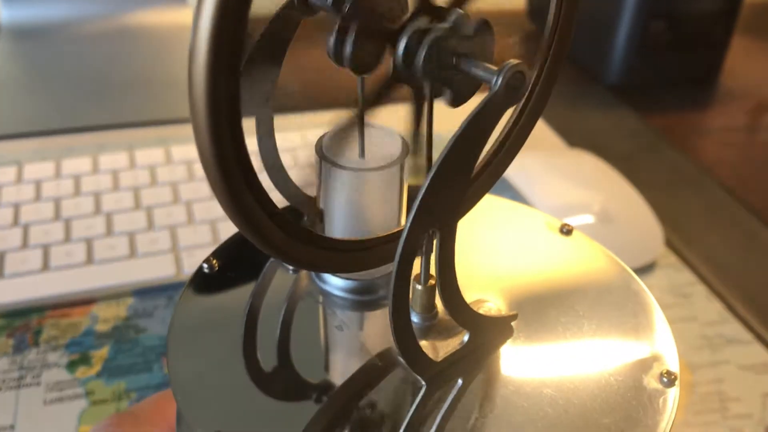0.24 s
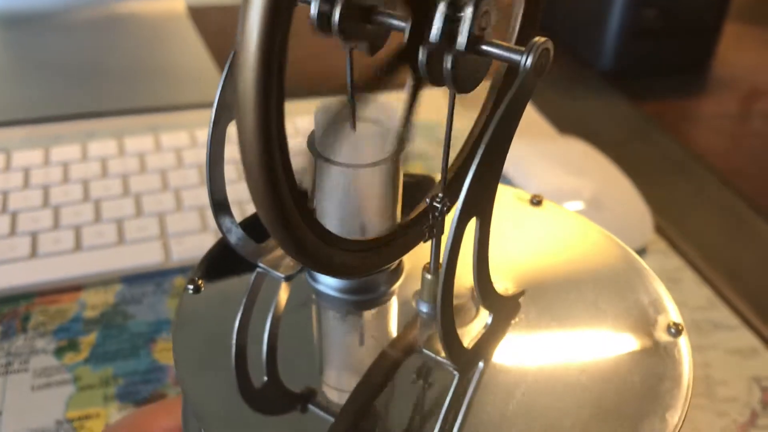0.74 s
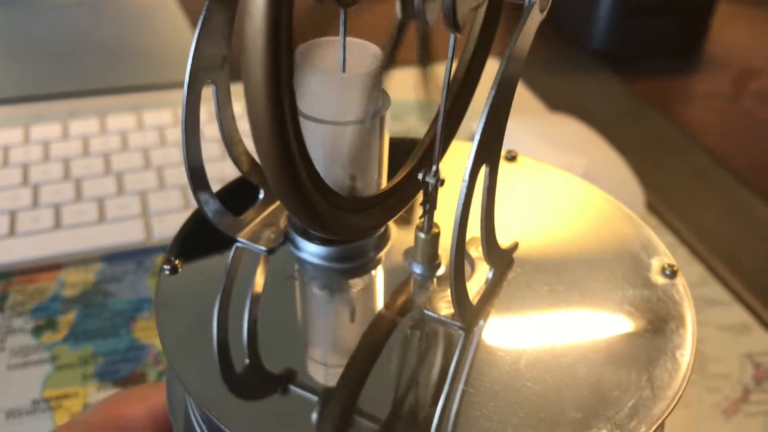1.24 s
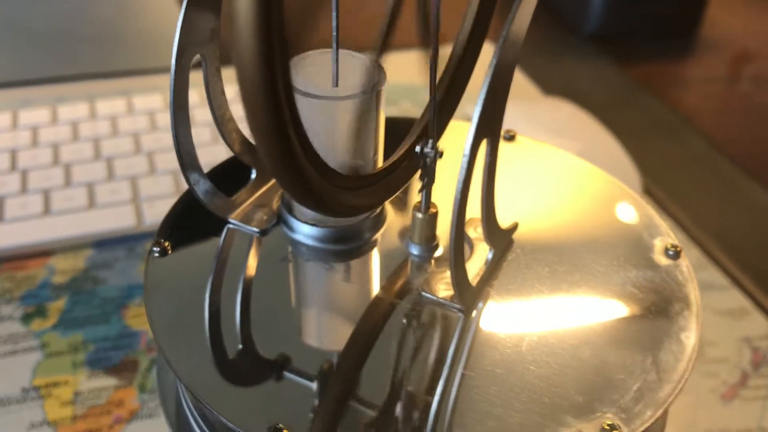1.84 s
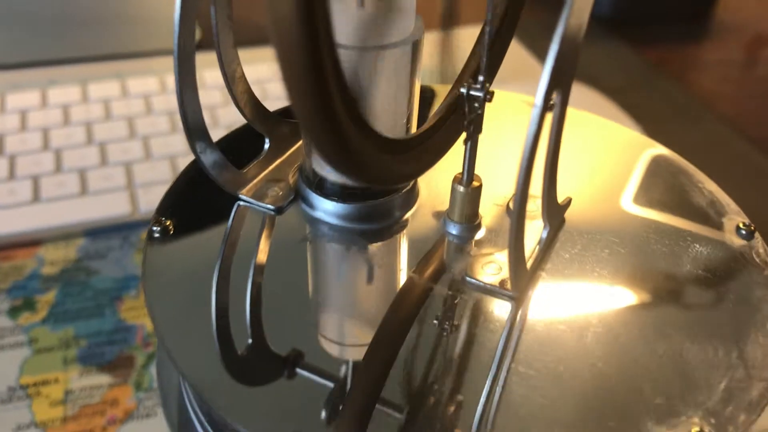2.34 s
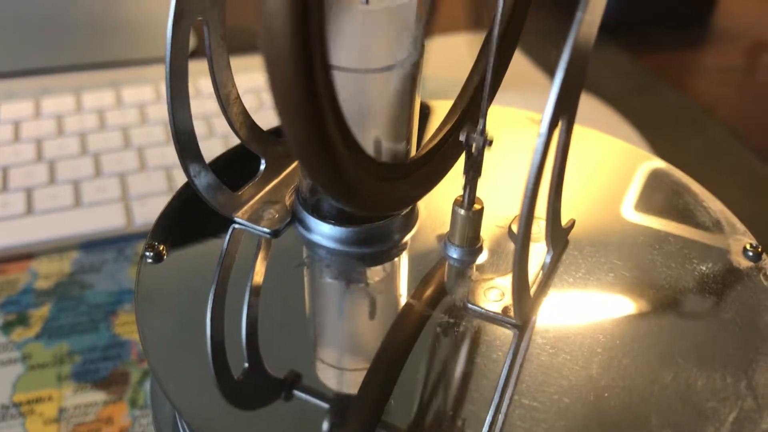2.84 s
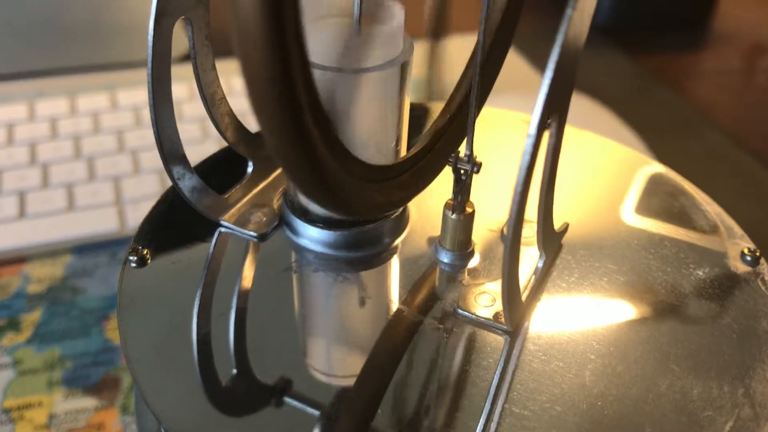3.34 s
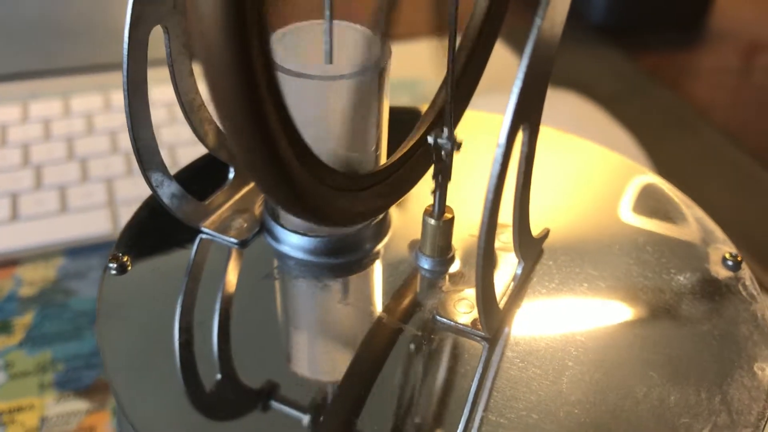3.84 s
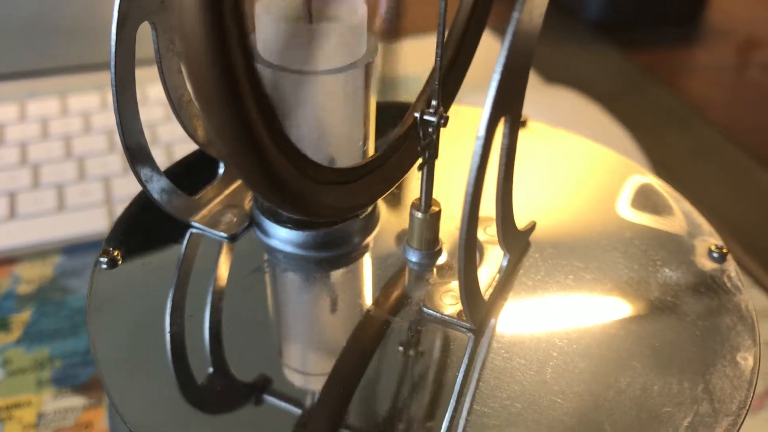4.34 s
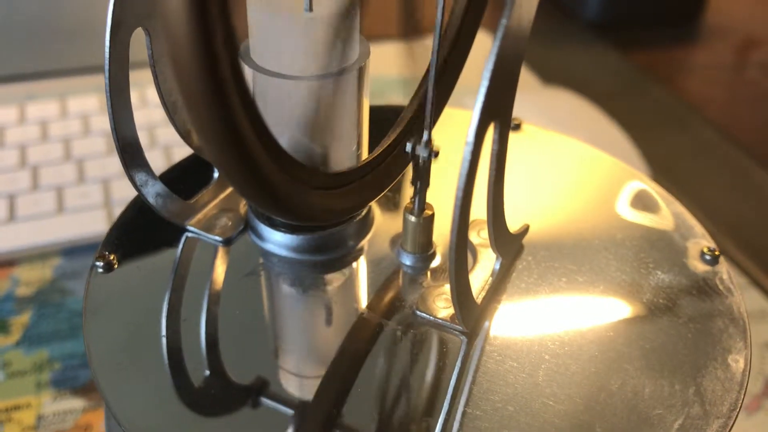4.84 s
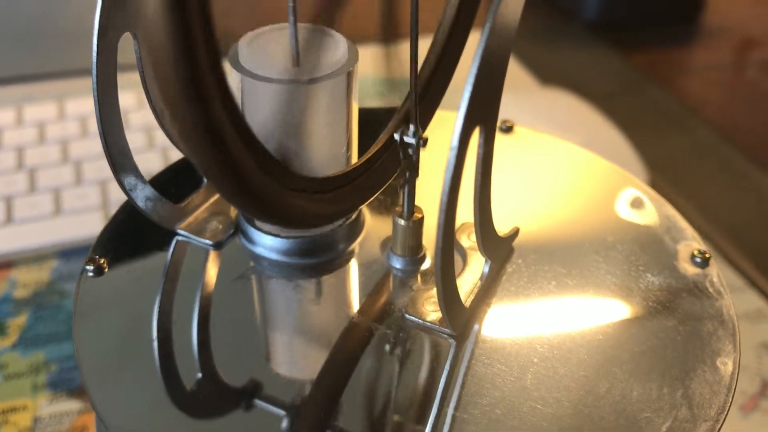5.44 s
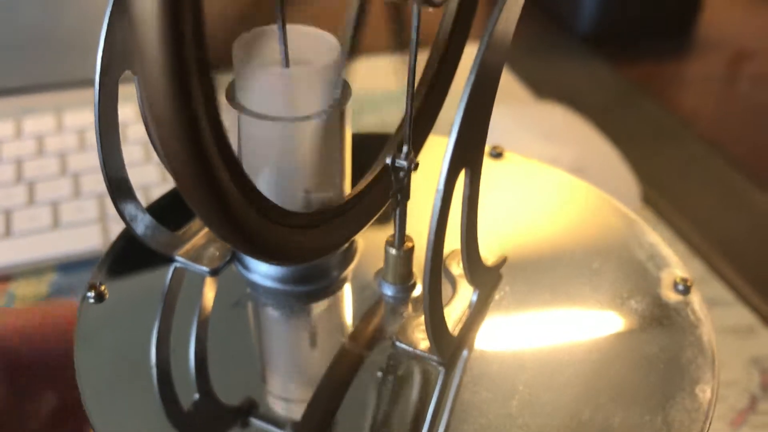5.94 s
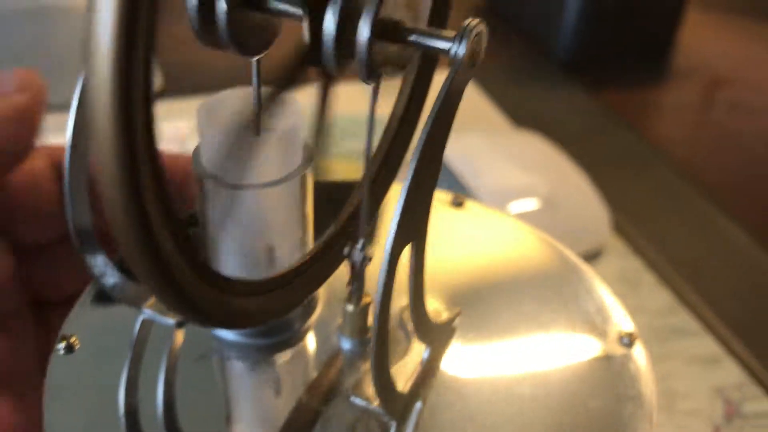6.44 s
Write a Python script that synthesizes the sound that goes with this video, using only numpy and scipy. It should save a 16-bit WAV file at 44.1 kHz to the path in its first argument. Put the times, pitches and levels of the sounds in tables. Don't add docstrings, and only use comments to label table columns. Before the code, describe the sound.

A small desktop hot-air engine clacks steadily about two and a half turns a second, each stroke squeaking thinly over faint room hum.

```python
import sys
import numpy as np
from scipy import signal
from scipy.fft import rfft, irfft, next_fast_len
from scipy.io import wavfile
from scipy.ndimage import map_coordinates

SR = 44100
rng = np.random.default_rng(int(sys.argv[2]) if len(sys.argv) > 2 else 0)


def digitize_waveform(pressure):
    field = np.atleast_2d(pressure).T
    bounded = np.clip(field, -1, 1)
    quanta = np.round(bounded * 32767).astype(np.int16)
    wavfile.write(sys.argv[1], SR, quanta)


def gain_from_decibels(decibels):
    exponent = np.asarray(decibels, float) / 20
    return 10 ** exponent


N = 294131
T = np.arange(N) / SR

# time in s, peak in dB, thud in dB, glass song in dB, wheel song in dB.
BOTTOM_KNOCKS = [(0.2796, -23, -5.5, -59, -82), (0.6873, -24, -9.5, -53, -84),
                 (1.0935, -25.5, -7.5, -60, -90), (1.498, -21, -8, -61, -57), (1.9006, -22, -5, -50, -84),
                 (2.3022, -25, -6.5, -54, -52), (2.703, -21, -6.5, -48, -51),
                 (3.102, -21.5, -6.5, -49.5, -54.5), (3.5007, -21, -6, -52, -57),
                 (3.899, -23, -6, -54, -48), (4.2963, -23, -7, -49.5, -58),
                 (4.6924, -22.5, -4.5, -49.5, -51), (5.0883, -21, -8.5, -52, -53.5),
                 (5.4839, -20, -6, -53.5, -54), (5.8765, -21.5, -6, -52, -54),
                 (6.2703, -23.5, -6, -50, -62), (6.663, -22.5, -14, -59, -46)]
# time in s, peak in dB, thud in dB.
TOP_KNOCKS = [(0.0817, -28, -16), (0.49, -28.5, -17.5), (0.897, -29, -17), (1.3024, -28.5, -19),
              (1.7055, -27.5, -17), (2.1077, -28, -14.5), (2.5087, -28, -15), (2.908, -26.5, -18),
              (3.3074, -26.5, -18), (3.706, -28, -18), (4.1021, -28, -18), (4.4996, -26.5, -17),
              (4.8962, -27.5, -19), (5.2906, -25, -17.5), (5.686, -24.5, -18.5), (6.0782, -25, -19),
              (6.471, -29.5, -13)]
# push after the click in s, build-up in s.
CONTACT_PUSH = [
    (-.0014, .0031),
    (.002, .0051),
    (-.0003, .0019),
]


def unit(x):
    return x / np.sqrt(np.mean(x ** 2) + 1e-20)


def along(points, hz):
    f, v = np.transpose(points)
    return np.interp(np.log(hz + 1), np.log(f + 1), v)


def wobble(rate):
    return map_coordinates(rng.standard_normal(int(N * rate / SR) + 4), [T * rate])


def flutter(depth_db, rate):
    return gain_from_decibels(depth_db * (np.tanh(wobble(rate) + .4) - .3))


def swells(rows):
    return sum(gain_from_decibels(db) * np.exp(-((T - s) / half) ** 2) for s, half, db in rows)


def filtered(x, response):
    m = next_fast_len(len(x) + SR // 2)
    return irfft(rfft(x, m) * response(np.fft.rfftfreq(m, 1 / SR)), m)[:len(x)]


def resonant(x, peaks):
    def response(f):
        return sum((-1) ** k * gain_from_decibels(db) * 1j * f * w / (c * c - f * f + 1j * f * w)
                   for k, (c, w, db) in enumerate(peaks))
    return filtered(x, response)


def tone(hz):
    return np.sqrt(2) * np.sin(2 * np.pi * np.cumsum(hz + 0 * T) / SR)


def thud(spot):
    # mode in Hz, t60 in s, then the swing at bottom, top and tap in thousandths.
    body_modes = [(128, .45, 1, .6, -.3), (160, .12, 3, 2, .2), (249, .1, -18.9, -4.3, -1.3),
                  (254, .17, 9.1, 0, 1.1), (286, .08, 7.1, -5.8, 1.3), (531, .12, 3.9, .2, -2.1),
                  (548, .11, 5.7, 5, -6.2), (616, .09, -11, -4.1, -3.7), (681, .04, 4.6, -12.9, 6.7),
                  (710, .11, 4.3, 4.9, -.7), (740, .29, -2.2, -.2, -.5), (926, .03, -11.6, -4.2, 1),
                  (997, .03, -13.6, .6, 0), (1049, .03, 5.5, -2.5, 0)]
    hz, t60, *swing = np.transpose(body_modes)[..., None]
    t = T[:SR // 4]
    ringing = swing[spot] / 1000 * np.sin(2 * np.pi * hz * t) * gain_from_decibels(-60 * t / t60)
    return ringing.sum(0) * (1 - np.exp(-t / CONTACT_PUSH[spot][1]))


def knocks(events, modes, crack, ring_db, crack_db, thud_db, damp, echoes, spot=2):
    # frequency in Hz, t60 in s.
    ring_out = [(900, 0.11), (2500, 0.16), (5000, 0.078), (9000, 0.12), (15000, 0.0086)]
    size = SR // 5
    t, out, pushes = T[:size], np.zeros(N + SR), np.zeros(N + SR)
    for s, db, low_db, *_ in events:
        for late, less_db in echoes:
            hz, tt, z = signal.stft(rng.standard_normal(size), SR, nperseg=128)
            decay_db = 60 * tt / (damp * along(ring_out, hz)[:, None])
            z = z * gain_from_decibels(along(crack, hz)[:, None] - decay_db)
            noise = signal.istft(z, SR, nperseg=128)[1][:size]
            hit = gain_from_decibels(crack_db) * noise * (0.83 + 0.61 * np.exp(-t / 0.00097))
            for f, (level, t60) in modes:
                mode_db = ring_db + level + rng.normal(0, 0.94) - 60 * t / min(t60, .15)
                hit += gain_from_decibels(mode_db) * np.sin(2 * np.pi * f * t)
            at = max(round((s + late * (1 + .1 * rng.normal())) * SR), 0)
            gain = gain_from_decibels(db + less_db + (late != 0) * rng.normal(0, 2.0))
            out[at:at + size] += gain * hit * (1 - np.exp(-t / 0.00031))
        pushes[round((s + CONTACT_PUSH[spot][0]) * SR)] = gain_from_decibels(db + low_db + thud_db)
    return out[:N] + signal.fftconvolve(pushes, thud(spot))[:N]


def bottom_knocks():
    plate_hz = (1055, 1308, 1560, 2540, 2934, 3090, 3854, 4581, 7085, 8311, 8473, 9220, 9860, 10260, 11410,
                11630, 12390, 14820, 15450)
    # level in dB, t60 in s.
    plate_ring = [(-3, 0.072), (-20, 0.17), (-1, 0.03), (10, 0.027), (-7.5, 0.047), (-10, 0.11),
                  (-15.5, 0.065), (-42, 0.3), (-5, 0.032), (-15.5, 0.12), (-9.5, 0.12), (-2, 0.038),
                  (-10.5, 0.33), (-31.5, 0.28), (0, 0.032), (-5, 0.061), (-7, 0.058), (3.5, 0.03),
                  (-16, .02)]
    # frequency in Hz, crack noise in dB per Hz.
    crack = [(530, -39), (900, 2), (1450, -14), (2560, 0), (3600, -16), (7850, -10.5), (8350, -15.5),
             (13300, -19.5), (15200, -17), (16500, -55)]
    return knocks(BOTTOM_KNOCKS, list(zip(plate_hz, plate_ring)), crack,
                  ring_db=-17.0, crack_db=-1.0, thud_db=28.5, damp=0.56, spot=0,
                  echoes=[(-.0035, -21), (0, -2.5), (.006, -11.5), (.013, -15), (.021, -17), (.058, -20.5)])


def top_knocks():
    frame_hz = (1540, 2560, 2930, 3300, 4608, 5600, 6500, 7090, 7704, 8473, 10970, 11640, 12380, 14790)
    # level in dB, t60 in s.
    frame_ring = [(-4.5, 0.048), (2.5, 0.045), (-6.5, 0.06), (-11.5, 0.12), (-45, 0.017), (-7.5, 0.16),
                  (-32, 0.014), (1.5, 0.03), (-3.5, 0.027), (-31, 0.032), (-34, 0.017), (1.5, 0.015),
                  (-4.5, 0.022), (-9, 0.019)]
    # frequency in Hz, crack noise in dB per Hz.
    crack = [(530, -24), (900, -11.5), (1940, -5), (2630, -16), (3780, -12), (7210, -4), (10000, -23),
             (11900, -42), (15300, -50), (16500, -46)]
    return knocks(TOP_KNOCKS, list(zip(frame_hz, frame_ring)), crack,
                  ring_db=-15.5, crack_db=-1.0, thud_db=43.0, damp=0.5, spot=1, echoes=[(0, 1), (.008, -10)])


def grip_level_db(rows):
    s, hold, db = np.transpose(rows)[..., None]
    t = T[::32]
    after = t - s - hold
    body = np.minimum(0, np.minimum(1500 * (t - s), -1500 * after))
    tail = np.where(after > 0, -13 - 279 * after, -120)
    power = gain_from_decibels(2 * (db + np.maximum(body, tail))).sum(0)
    return np.interp(T, t, 10 * np.log10(power + 1e-12))


def whistle(climb):
    # time in s, climb of the slip rate per stroke in Hz.
    glide = [(0, 331.4), (1, 260), (2, 180), (3.5, 190.8), (5, 176.7), (6.6, 218.4)]
    lock_at = (.03, .045, .06, .075, .09, .105, .125, .15)
    lock_notes = [(5580, 5580, 5590, 5570, 5760, 5750, 5770, 5750),
                  (5520, 5590, 5640, 5840, 5850, 5730, 5590, 5710),
                  (5540, 5570, 5530, 5630, 5570, 5550, 5730, 5630),
                  (5540, 5580, 5570, 5670, 5600, 5790, 5730, 5670),
                  (5550, 5690, 5560, 5600, 5600, 5550, 5780, 5560),
                  (5580, 5570, 5570, 5640, 5650, 5600, 5640, 5740),
                  (5600, 5550, 5630, 5600, 5640, 5680, 5670, 5600),
                  (5520, 5550, 5570, 5630, 5590, 5650, 5590, 5570),
                  (5350, 5560, 5560, 5630, 5640, 5640, 5680, 5530),
                  (5530, 5580, 5630, 5640, 5640, 5650, 5660, 5630),
                  (5580, 5500, 5600, 5630, 5620, 5570, 5590, 5600),
                  (5550, 5560, 5660, 5620, 5460, 5780, 5750, 5600),
                  (5580, 5570, 5590, 5610, 5550, 5640, 5660, 5640),
                  (5620, 5560, 5570, 5610, 5610, 5640, 5630, 5600),
                  (5560, 5580, 5590, 5650, 5720, 5700, 5770, 5800),
                  (5610, 5460, 5540, 5540, 5570, 5840, 5640, 5660),
                  (5550, 5570, 5560, 5620, 5740, 5740, 5350, 5630)]
    slip_hz = 5480 + climb * np.interp(T, *np.transpose(glide)) + 25 * wobble(70) + 18 * wobble(300)
    moments = np.ravel([e[0] + np.array(lock_at) for e in TOP_KNOCKS])
    lock_hz = np.interp(T, moments, np.ravel(lock_notes))
    locked = flutter(1.5, 120) * tone(np.clip(lock_hz, 5460, 5850) + 8 * wobble(120))
    rough_hz = (slip_hz - 5480) * climb * .4 * wobble(400)
    loose = flutter(3.5, 200) * tone(slip_hz + rough_hz)
    return (1.05 - .35 * climb) * locked + (.08 + .4 * climb) * loose


def octave(climb, flares):
    flare_notes = [11640, 11350, 11410, 11200, 11400, 11490, 11370, 11280, 11530, 11100, 11340, 10900,
                   11270, 11400, 11230, 11600, 11100, 11280, 11640, 11500, 11540, 11240, 11360, 11460,
                   11460, 10860, 11350, 11520, 11300, 11500]
    flare_hz = np.interp(T, [s + hold / 2 for s, hold, _ in flares], flare_notes)
    wandering = flutter(8.3, 150) * tone(flare_hz + 60 * wobble(90) + 90 * wobble(350))
    return wandering + .3 * climb * flutter(10, 90) * tone(11630 + 50 * wobble(200))


def groan(climb, grain, main_db):
    # early level in dB, late level in dB.
    groan_levels = [(-60.5, -63), (-53, -63.5), (-53, -69), (-55.5, -73), (-76, -60), (-66, -52.5),
                    (-60.5, -49), (-58, -55), (-53.5, -62), (-60.5, -54.5), (-61, -57), (-54, -50.5),
                    (-56.5, -67), (-58, -52), (-58, -56), (-58.5, -60), (-57, -51)]
    level = 0
    for e, (early, late) in zip(TOP_KNOCKS, groan_levels):
        past = T - e[0]
        curve_db = np.interp(past, [-.2, 0, .039, .096, .125, .131, .256],
                             [-120, early, early, late, late - 3, late - 15, late - 0.13 * 353])
        level = level + gain_from_decibels(curve_db) + (abs(past - .15) < .03) * gain_from_decibels(main_db - 12.5)
    low = flutter(6, 85) * tone(2600 + 75 * np.tanh(8 * climb - 4) + 18 * wobble(120))
    peaks = [(2510, 150, -3.5), (2656, 54, -3.5), (2906, 29, 1.0), (3184, 16, 0.5)]
    low += gain_from_decibels(-4.0) * unit(resonant(grain, peaks))
    return level * low


def fizz(climb, grain, grip_db):
    hiss = unit(resonant(grain, [(5685, 150, 13.0), (7000, 910, -7.5), (8540, 360, 0.0), (11700, 110, 3.5)]))
    hiss = filtered(hiss, lambda hz: gain_from_decibels(along([(12000, 1), (13000, -16), (15500, -18)], hz)))
    hiss += gain_from_decibels(-15.0) * flutter(7.5, 60) * wobble(900) * tone(13750 + 1050 * climb + 150 * wobble(30))
    return hiss * gain_from_decibels(-53.5 + 0.37 * (grip_db + 39.5))


def squeal():
    # start in s, hold in s, level in dB.
    catches = [(.154, 0.051, -42.5), (.124, 0.016, -38.5), (.535, 0.011, -38.5), (.939, 0.012, -43),
               (.967, 0.0023, -47), (1.343, 0.026, -43), (1.435, 0.037, -42.5), (1.768, 0.017, -34),
               (1.756, .004, -62), (2.155, 0.012, -39.5), (2.174, .008, -35), (2.233, 0.0048, -41.5),
               (2.556, 0.0041, -38.5), (2.581, 0.0039, -37.5), (2.6, .005, -45.5), (2.948, 0.016, -46),
               (2.975, 0.0044, -36.5), (2.995, 0.003, -42), (3.346, 0.0075, -44), (3.367, 0.0029, -37),
               (3.39, 0.0068, -42.5), (3.747, 0.039, -41), (4.155, 0.027, -38.5), (4.538, 0.032, -43.5),
               (4.57, 0.0032, -35.5), (4.954, 0.022, -32.5), (4.988, 0.012, -48), (5.341, 0.036, -35),
               (5.433, 0.0059, -42.5), (5.728, 0.016, -36.5), (6.124, 0.045, -46.5), (6.163, 0.0019, -37),
               (6.515, 0.058, -41)]
    # start in s, hold in s, level in dB.
    flares = [(.18, 0.0047, -43.5), (.947, 0.024, -56), (1.395, 0.0014, -39), (1.435, 0.018, -47),
              (1.787, 0.012, -33.5), (2.177, 0.0048, -38), (2.192, 0.0066, -40), (2.228, 0.012, -32.5),
              (2.587, 0.0094, -36), (2.962, .002, -51), (2.99, 0.0075, -40), (3.353, 0.0085, -43.5),
              (3.389, 0.012, -42), (3.783, .01, -43), (4.143, 0.032, -49), (4.191, 0.0077, -38.5),
              (4.565, 0.0033, -50), (4.584, 0.0041, -36), (4.606, 0.0023, -38), (4.955, 0.02, -45),
              (4.988, 0.015, -40), (5.335, 0.0082, -49), (5.357, 0.037, -41.5), (5.429, 0.0064, -37.5),
              (5.768, 0.014, -39), (6.128, 0.0065, -42), (6.162, 0.0098, -41), (6.192, 0.003, -34),
              (6.537, 0.041, -47.5), (6.576, 0.0025, -41)]
    main_db, high_db = grip_level_db(catches), grip_level_db(flares)
    on = sum(np.interp(T - e[0], [.018, .028, .146, .174], [0, 1, 1, 0]) for e in TOP_KNOCKS) ** 2
    climb = sum(np.interp(T - e[0], [0, .03, .12, .19], [0.017, 0.0327, 1, 0.84], 0, 0) for e in TOP_KNOCKS)
    grip = flutter(1.5, 80)
    main = gain_from_decibels(main_db) * grip * whistle(climb)
    high = on ** 2 * gain_from_decibels(high_db - 2.0) * grip * octave(climb, flares)
    high = .6 * high + resonant(high, [(11320, 110, -1), (11630, 70, 3)])
    grains = rng.standard_normal((2, N)) * gain_from_decibels(1.7 * wobble(160))
    low = groan(climb, grains[0], main_db)
    return on * (main + low + fizz(climb, grains[1], np.maximum(main_db, high_db))) + high


def rasp():
    # early level in dB, late level in dB.
    stroke_levels = [(-62, -58), (-61, -71), (-59, -73), (-58, -57.5), (-66, -73), (-55, -58), (-65, -65),
                     (-59, -57), (-60, -68), (-58, -62), (-61, -52.5), (-56, -61), (-58, -70), (-51, -68),
                     (-54.5, -59), (-73, -60.5), (-61, -55)]
    # time after the top in s, half length in s.
    stroke_times = [
        (0.046, 0.011),
        (0.079, 0.025),
    ]
    # time in s, half length in s, level in dB.
    extra = [(.185, 0.0078, -62), (1.445, 0.015, -66), (1.817, 0.0061, -53), (2.215, 0.015, -60),
             (4.595, 0.0093, -57), (5.432, .009, -60)]
    rows = list(extra)
    for e, dbs in zip(TOP_KNOCKS, stroke_levels):
        rows += [(e[0] + at, half, db) for (at, half), db in zip(stroke_times, dbs)]
    climb_hz = sum(np.interp(T - e[0], [.03, .09, .2], [0, 220, 200], 0, 0) for e in TOP_KNOCKS)
    hz = 2900 + climb_hz + 50 * wobble(150)
    peaks = [(2720, 90, -4), (2940, 50, 0), (3090, 50, -1), (3200, 70, -3)]
    grit = unit(resonant(rng.standard_normal(N), peaks))
    return swells(rows) * flutter(7.3, 170) * (0.78 * tone(hz) + 0.67 * grit)


def rod_taps():
    second_db = [-44.5, -41.5, -40.5, -40, -44.5, -48, -44.5, -47, -45, -44.5, -40, -41, -44, -40.5, -41.5,
                 -41, -46]
    # time in s, peak in dB, thud in dB.
    odd_taps = [(1.679, -45.5, -2), (2.066, -52, 2), (2.835, -51, 10), (3.2794, -46.5, 3),
                (4.067, -42.5, 1.5), (4.079, -50.5, 10), (4.362, -50, -4)]
    # frequency in Hz, crack noise in dB per Hz.
    crack = [(530, -14), (900, -4.5), (2030, -12.5), (3190, -2.5), (4890, -10.5), (11700, -8), (15500, -12),
             (16500, -64)]
    taps = list(odd_taps)
    for e, second in zip(BOTTOM_KNOCKS, second_db):
        taps.append((e[0] - .0678, -48.5, -45.5 + 48.5))
        taps.append((e[0] - .0382, second, -35 - second))
    return knocks(taps, [(3190, (0, 0.064)), (3560, (-9, 0.029))], crack,
                  ring_db=-9.5, crack_db=6.5, thud_db=36.0, damp=0.53,
                  echoes=[(-.001, -3), (.0035, -5.5), (.011, -7.5)])


def ticks():
    # time in s, peak in dB, thud in dB.
    stray = [(1.064, -35, -28), (1.4505, -46, -30), (2.657, -43, -30), (3.8685, -35, -30),
             (4.2675, -35, -32), (4.449, -51, -30), (5.816, -50, -30), (6.212, -49, -30), (6.579, -38, -30),
             (6.6035, -44, -30), (.2535, -35, -30), (.818, -63, -30), (1.222, -62, -30), (1.232, -67, -30),
             (2.062, -46, -30), (3.59, -50, -34), (5.222, -61, -30), (5.246, -44, -30), (6.041, -43, -30),
             (6.201, -46, -30), (2.8614, -37, -30), (4.071, -44, -32), (5.5588, -25, -28)]
    # lead before the bottom in s, peak in dB.
    pings = [
        (0.12, -48),
        (0.0074, -39),
    ]
    # frequency in Hz, crack noise in dB per Hz.
    crack = [(530, -51), (900, -30), (3000, -27), (3650, -24), (8870, -8.5), (10500, -14), (15900, -5),
             (16500, -23)]
    clicks = [(e[0] - lead, db, -30) for lead, db in pings for e in BOTTOM_KNOCKS]
    return knocks(list(stray) + clicks, [], crack,
                  ring_db=0, crack_db=2.5, thud_db=20, damp=0.33, echoes=[(0.0029, 0)])


def snaps():
    # time in s, peak in dB, thud in dB.
    snap_events = [
        (0.658, -28, -34),
        (1.7497, -30, -30),
    ]
    # frequency in Hz, crack noise in dB per Hz.
    crack = [(500, -24), (1500, -13), (5000, -2.5), (15000, -9)]
    return knocks(snap_events, [], crack,
                  ring_db=0, crack_db=-2.0, thud_db=27, damp=0.25, echoes=[(0.0017, 0)])


def songs():
    # time in s, pitch in Hz, level in dB, half length in s.
    chirps = [(1.967, 870, -58, 0.0071), (2.392, 926, -51, 0.02), (3.157, 856, -49.5, 0.0046),
              (3.566, 865, -54, 0.0072), (3.585, 746, -55.5, 0.012), (4.361, 856, -48, 0.0045),
              (4.362, 2510, -45, 0.0045), (4.361, 1630, -58, 0.0062), (4.385, 740, -50.5, 0.018)]
    glass, wheel, chirp = 0, 0, 0
    for s, _, _, glass_db, wheel_db in BOTTOM_KNOCKS:
        glass_curve = np.interp(T - s, [.006, .018, .052, .06, .08], [0.002, 0.38, 1, 0.19, 0.0025])
        wheel_curve = np.interp(T - s, [0, .025, .09, .14], [0.76, 0.39, 0.1, 0.012], 0, 0)
        glass = glass + gain_from_decibels(glass_db) * glass_curve
        wheel = wheel + gain_from_decibels(wheel_db) * wheel_curve
    pair = tone(8311 + 12 * wobble(60)) + 0.37 * tone(8475 + 8 * wobble(25))
    for s, hz, db, half in chirps:
        chirp = chirp + swells([(s, half, db)]) * tone(hz * (1 + np.clip(T - s, -half, half)))
    return glass * flutter(3.1, 70) * tone(2630 + 15 * wobble(54)) + wheel * flutter(14.3, 40) * pair + chirp


def rubbing():
    # place in the turn from the bottom (0-1), rise in turns, fall in turns, rods in dB, base in dB.
    scuffs = [(0, 0.02, 0.038, -57, -49), (0.109, 0.098, 0.05, -53.5, -53.5), (.49, 0.07, 0.015, -63, -73),
              (0.519, 0.026, 0.069, -44.5, -52.5), (.66, 0.13, 0.097, -58, -66.5),
              (.87, 0.11, 0.031, -66, -67.5)]
    slide_db = (-83, -67)
    # mode in Hz, width in Hz, level in dB.
    rod_modes = [(1540, 200, -10), (2520, 30, 7), (2580, 200, -1), (2930, 90, -4), (3090, 60, -3),
                 (3850, 100, -10), (4590, 35, -3), (5590, 90, -4), (7090, 300, -8), (8400, 110, -1),
                 (9850, 300, -10), (11500, 700, -14), (12400, 500, -16), (14800, 500, -14)]
    # mode in Hz, width in Hz, level in dB.
    base_modes = [(160, 5.9, -10.5), (239.7, 29, -2), (297.6, 29, -5), (540, 48, -3.5), (612, 41.4, 1),
                  (710.3, 31.5, 0.5), (950, 120, -15)]
    marks = np.sort([e[0] for e in BOTTOM_KNOCKS + TOP_KNOCKS])
    turn = np.interp(T, np.r_[marks[0] - .21, marks], np.arange(len(marks) + 1) / 2) % 1
    level = gain_from_decibels(np.array(slide_db))[:, None]
    for at, rise, fall, *dbs in scuffs:
        past = (turn - at + .5) % 1 - .5
        level = level + gain_from_decibels(np.array(dbs))[:, None] * np.exp(-(past / np.where(past < 0, rise, fall)) ** 2)
    grit = rng.standard_normal((2, N)) * gain_from_decibels(1.03 * wobble(50) + 4.9 * wobble(300))
    rods = level[0] * unit(grit[0])
    base = level[1] * unit(grit[1])
    return gain_from_decibels(8) * resonant(rods, rod_modes) + gain_from_decibels(-44) * rods + gain_from_decibels(19.5) * resonant(base, base_modes)


def sleeve():
    # time in s, half length in s, level in dB.
    brushes = [
        (1.753, 0.28, -66),
        (5.886, 0.46, -65),
    ]
    return swells(brushes) * unit(resonant(rng.standard_normal(N), [(7660, 67000, 0)]))


def handling():
    # time in s, half length in s, level in dB.
    bumps = [
        (0.23, .05, -63.5),
        (6.398, 0.065, -60),
    ]
    rumble = unit(resonant(rng.standard_normal(N), [(83, 18, -0.43), (180, 67, -1.6)]))
    return swells(bumps) * flutter(3.2, 30) * rumble


def room():
    # frequency in Hz, air noise in dB per Hz.
    air_curve = [(15, -65), (25, 0), (124, 4.5), (259, 0), (445, -5), (600, 5), (787, -6), (2150, -12),
                 (2600, -7.5), (3700, -14.5), (8370, -17), (10400, -22), (11600, -21.5), (15200, -19.5),
                 (16500, -34)]
    # fan note in Hz, wander in Hz, rms level in dB.
    fan_notes = [(124, 4.76, -69)]
    air = unit(filtered(rng.standard_normal(N), lambda hz: gain_from_decibels(along(air_curve, hz))))
    beat = sum(np.exp(-((T - e[0] - .04) / 0.044) ** 2) for e in BOTTOM_KNOCKS)
    fan = sum(gain_from_decibels(db + 2.4 * wobble(13) + 5.5 * beat) * tone(hz + wander * wobble(12))
              for hz, wander, db in fan_notes)
    return gain_from_decibels(-64.5) * air + fan


def scene():
    crank = bottom_knocks() + top_knocks() + rod_taps() + ticks() + snaps()
    piston = squeal() + rasp()
    return (crank + piston + songs() + rubbing() + sleeve() + handling() + room())[None]


def top_cut(x):
    return signal.sosfilt(signal.butter(12, 16680, fs=SR, output="sos"), x)


def record(dry):
    edges = [(25, -14), (40, 0), (15600, 0), (15800, -22), (16500, -26)]  # (Hz, dB)
    mix = filtered(dry[0], lambda hz: gain_from_decibels(along(edges, hz)))[None]
    return top_cut(mix)


dry = scene()
out = record(dry)
digitize_waveform(out)
```